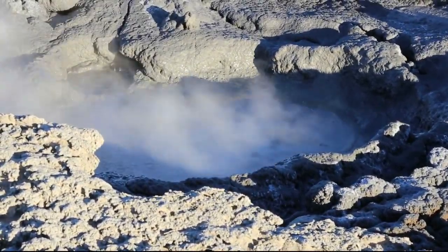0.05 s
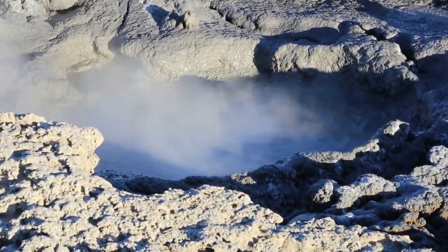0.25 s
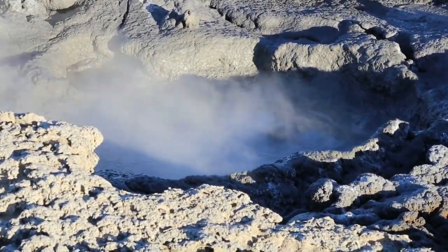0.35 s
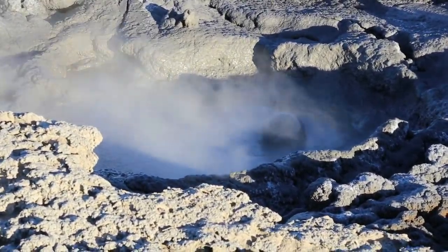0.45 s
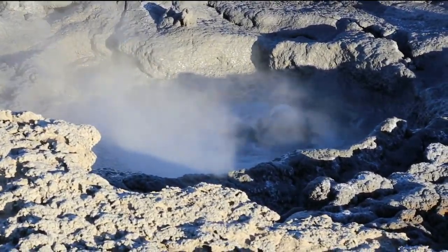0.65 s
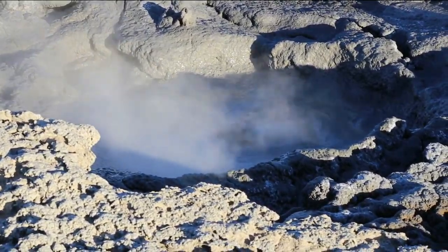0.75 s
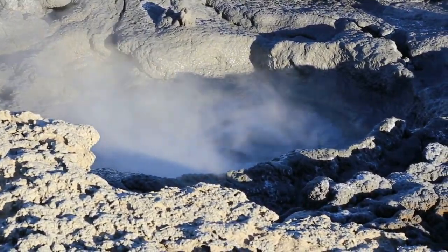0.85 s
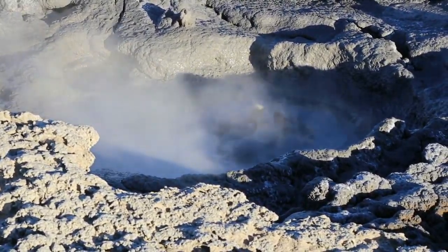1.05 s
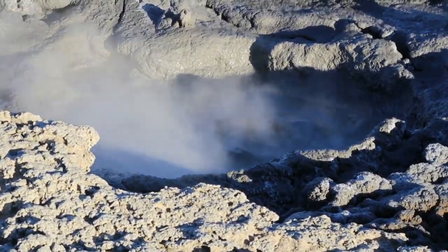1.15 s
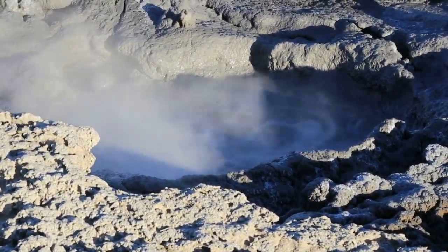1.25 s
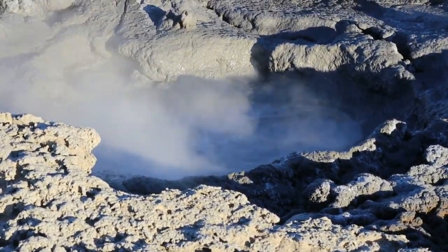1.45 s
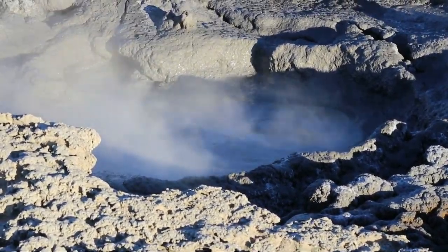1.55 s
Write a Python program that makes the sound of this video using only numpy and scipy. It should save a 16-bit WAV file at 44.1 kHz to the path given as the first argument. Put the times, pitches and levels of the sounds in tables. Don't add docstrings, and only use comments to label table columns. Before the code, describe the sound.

Close outdoor pickup of a bubbling mud pot, irregular plops, hollow gulps, splats and tiny ticks over constant seethe and quiet steam; the loudest bubble snaps late with short dull rim echoes, then activity thins.

```python
import sys
import numpy as np
from scipy import signal
from scipy.io import wavfile

SR = 44100
rng = np.random.default_rng(int(sys.argv[2]) if len(sys.argv) > 2 else 0)


def persist_wave(psi):
    counts = np.round(np.clip(psi, -1, 1) * 32767).astype(np.int16)
    wavfile.write(sys.argv[1], SR, np.atleast_2d(counts).T)


def volts_from_decibels(level):
    exponent = np.asarray(level, float) / 20
    return 10 ** exponent


N = 70560


def rms_one(x):
    return x / np.sqrt(np.mean(x ** 2) + 1e-20)


def bandpass(order, low_hz, high_hz, x):
    return signal.sosfilt(signal.butter(order, [low_hz, high_hz], "band", fs=SR, output="sos"), x)


def drift(rate_hz):
    pole = np.exp(-80 * np.pi * rate_hz / SR)
    noise = rng.standard_normal(N // 40 + 2002)
    slow = signal.lfilter([1], [1, -2 * pole, pole * pole], noise)[2000:]
    return np.interp(np.arange(N) / 40, np.arange(len(slow)), rms_one(slow))


def add(out, start_s, x):
    i = int(start_s * SR)
    out[i:i + len(x)] += x[:max(len(out) - i, 0)]


def banded(spectrum, patchy_db):
    hz, db = np.transpose(spectrum)
    together = drift(0.91)
    white = rng.standard_normal((2, N + SR))
    edges_hz = np.geomspace(hz[0], hz[-1], int(3 * np.log2(hz[-1] / hz[0])) + 1)
    out = 0
    for k, (low_hz, high_hz) in enumerate(zip(edges_hz, edges_hz[1:])):
        band = bandpass(2, low_hz, high_hz, white[k % 2])[SR:]
        level_db = np.interp(np.log(low_hz * high_hz) / 2, np.log(hz), db)
        flicker_db = patchy_db * (0.5 * together + drift(6.9))
        out = out + band * volts_from_decibels(level_db + flicker_db)
    return rms_one(out)


def bursts(rows, rise, attack_cycles):
    out = np.zeros(N)
    for start_s, peak_db, hz, ring_cycles in rows:
        cycle = np.arange(int(3 * ring_cycles / hz * SR) + 2) * hz / SR
        swell = 1 - np.exp(-(cycle / attack_cycles) ** 2)
        shape = swell * volts_from_decibels(-20 * cycle / ring_cycles)
        climb = 1 - rise / 2 + rise * cycle / ring_cycles
        add(out, start_s, volts_from_decibels(peak_db) * shape / shape.max() * np.sin(2 * np.pi * cycle * climb))
    return out


def vigour():
    # (time [s], level [dB])
    levels = [(0, -45.5), (.12, -47), (.18, -49), (.25, -45.5), (.41, -43.5), (.47, -47.5), (.6, -49),
              (0.658, -42), (.71, -43), (.76, -45.5), (.79, -38), (.82, -42.5), (.88, -44.5), (.93, -51.5),
              (1.0, -50.5), (1.1, -49.5), (1.25, -42.5), (1.33, -47), (1.6, -50.5)]
    s, db = np.transpose(levels)
    return np.interp(np.arange(N) / SR, s, db - db.mean())


def steam(swing_db):
    # (frequency [Hz], density [dB per Hz])
    spectrum = [(35, -9), (112, 1.5), (236, 6), (420, -6), (620, -1.5), (1600, -20), (3500, -25),
                (6400, -27)]
    level_db, follow, shelf_hz = -40, 0.06, 5330
    shelf = signal.ellip(4, 1, 25, shelf_hz, fs=SR, output="sos")
    return volts_from_decibels(level_db + follow * swing_db) * signal.sosfilt(shelf, banded(spectrum, patchy_db=0.7))


def seethe(swing_db):
    # (low [Hz], high [Hz], rate [per s], ring [cycles], level [dB], share of vigour swing [1])
    families = [
        (140, 326, 500, 4.5, -50.5, 0.067),
        (315, 1116, 500, 4.7, -49.5, 1.05),
        (1200, 4410, 2200, 4.1, -49, 0.93),
        (5000, 12000, 910, 2.8, -80, 2.2),
    ]
    n_pitches = 14
    out = 0
    for low_hz, high_hz, rate, ring_cycles, db, share in families:
        sizes = volts_from_decibels(2.5 * np.minimum(rng.exponential(1, N), 2.8)) * rng.choice([-1, 1], N)
        born = rng.random(N) < rate * volts_from_decibels(2.5 * drift(8.0)) / SR
        dealt = rng.integers(0, n_pitches, N)
        family = 0
        for k, hz in enumerate(np.geomspace(low_hz, high_hz, n_pitches)):
            r = volts_from_decibels(-60 * hz / (ring_cycles * SR))
            w = 2 * np.pi * hz / SR
            mode = [0, np.sin(w), 0, 1, -2 * r * np.cos(w), r * r]
            kicks = sizes * born * (dealt == k) + 1e-18
            family = family + w * signal.sosfilt([mode, mode], kicks)
        out = out + volts_from_decibels(db + share * swing_db) * rms_one(family)
    return out


def splats():
    # (start [s], length [s], level [dB], low [Hz], high [Hz])
    landings = [(0.032, 0.0076, -43.5, 1750, 3450), (.221, 0.0078, -47, 1200, 5200),
                (0.426, 0.016, -42, 2280, 4320), (0.683, 0.034, -45, 1200, 5000),
                (0.709, 0.015, -43, 1200, 5300), (0.757, 0.01, -57, 298, 1460),
                (0.779, 0.0089, -44.5, 1510, 5850), (0.964, 0.057, -42.5, 201, 660),
                (1.17, 0.0079, -41, 3030, 5500), (.685, .016, -61, 5000, 11000),
                (.712, 0.0064, -55.5, 5000, 12000), (1.236, 0.0043, -50, 2760, 6000),
                (1.243, 0.012, -47, 800, 5200), (1.26, 0.006, -51, 2000, 7000)]
    drops_per_s = 2500
    out = np.zeros(N)
    for (start_s, length_s, db, low_hz, high_hz), (chance, size) in zip(landings, rng.random((len(landings), 2, 4000))):
        u = np.arange(4000) / SR / length_s
        drops = (chance < drops_per_s / SR) * (size - 0.5)
        smear = 0.039 * (size - 0.5)
        shower = rms_one(bandpass(4, low_hz, high_hz, drops + smear))
        add(out, start_s, volts_from_decibels(db) * shower * np.minimum(8 * u, 1) * np.exp(-u ** 3))
    return out


def plops():
    # (time [s], peak [dB], pitch [Hz], ring [cycles])
    openings = [(.033, -31, 1000, 4.5), (.099, -31, 498, 5.1), (.1426, -32, 1290, 5.0),
                (.246, -30, 810, 2.6), (.339, -31, 704, 4.2), (.341, -33.5, 1090, 9.1),
                (.3975, -23, 740, 0.97), (.403, -35.5, 446, 8.1), (.409, -25, 635, 1.6),
                (.433, -31, 600, 3.3), (.486, -55, 590, 5.5), (.6672, -23.5, 540, 0.8),
                (.695, -32.5, 524, 9.3), (.7568, -21.5, 488, 1.9), (.7588, -22.5, 1350, 3.0),
                (.986, -27, 680, 0.47), (.996, -38, 596, 8.8), (1.106, -37.5, 616, 8.5),
                (1.2077, -26, 1200, 1.5), (1.2105, -31, 850, 3.5), (1.243, -31.5, 965, 7.5),
                (1.373, -31.5, 1160, 0.79), (1.4106, -29.5, 800, 1.4), (1.530, -44, 850, 13)]
    return bursts(openings, rise=0.074, attack_cycles=0.15)


def gulps():
    # (start [s], peak [dB], pitch [Hz], length [cycles])
    pockets = [(0.052, -34.5, 106, 2.2), (0.229, -25.5, 207, 5.9), (0.285, -20.5, 236.3, 7.3),
               (.312, -31.5, 299, 4), (.332, -36, 151, 3.9), (0.417, -30, 125, 3.3),
               (0.426, -30.5, 230, 3.5), (0.442, -25.5, 168, 2.5), (0.483, -28, 268, 2.55),
               (0.508, -31, 205, 3.1), (.705, -36, 252, 9.7), (0.744, -34, 225, 5),
               (0.7823, -25, 246.6, 3.86), (.776, -35, 154, 3.1), (0.966, -34.5, 309, 4.2),
               (.975, -31.5, 165, 5), (1.005, -38, 213, 5.3), (1.029, -36, 180, 4), (1.051, -38, 203, 4.6),
               (1.09, -35, 236.3, 9.2), (1.109, -35, 211, 8.3), (1.134, -36.5, 244, 6.3),
               (1.258, -34, 192, 4), (1.3, -39.5, 217, 7.3), (1.342, -35.5, 120, 3.9),
               (1.375, -39.5, 185, 6), (1.414, -31, 260, 2.6), (1.435, -33, 201, 3.6), (1.446, -36, 299, 5)]
    rise = 0.12
    out = np.zeros(N)
    for start_s, db, hz, cycles in pockets:
        u = np.linspace(0, 1, int(cycles / hz * SR))
        phase = 2 * np.pi * cycles * u * (1 + rise * (u - 1))
        add(out, start_s, volts_from_decibels(db) * np.sin(np.pi * u) ** 1.39 * np.sin(phase))
    return out


def pops():
    # (time [s], peak [dB], pitch [Hz], ring [cycles])
    skins = [(1.1688, -27, 2300, 4.1), (.2225, -32, 1530, 1.8), (.278, -39.5, 2300, 13),
             (.4085, -34.5, 3630, 5.8), (.428, -50, 3370, 4.0), (.4335, -34, 2600, 4),
             (.4338, -40, 4000, 4.3), (.592, -32.5, 1820, 5.2), (.593, -34.5, 3200, 7),
             (.6672, -30.5, 3760, 5.7), (.6672, -36, 2900, 2.8), (.696, -35.5, 2850, 11),
             (.756, -28.5, 3080, 4), (.7731, -26, 2400, 2.8), (.7809, -25, 2400, 1.6),
             (.7832, -30, 2200, 3), (.7768, -14.5, 1960, 2.46), (.7808, -25, 4170, 4.1),
             (.8015, -29, 2490, 3.8), (.8035, -20.5, 1590, 4.3), (.818, -42, 1480, 6.2),
             (.881, -36.5, 3000, 3.7), (1.1717, -1.5, 1950, 2.3), (1.1717, -30, 3260, 2.4),
             (1.2465, -38, 3960, 4.6), (1.2718, -30.5, 2280, 5.4), (1.537, -35.5, 2410, 4.4)]
    low_cut = signal.butter(1, 800, "high", fs=SR, output="sos")
    return signal.sosfilt(low_cut, -bursts(skins, rise=0.18, attack_cycles=0.65))


def crater(x):
    # (delay [s], level [dB])
    wall = [(.0019, -17), (.0028, -15), (.0037, -14), (.0049, -15), (.0058, -13), (.0067, -14),
            (.0090, -26), (.0101, -27), (.0112, -24), (.0127, -26)]
    out = np.zeros(N)
    for delay_s, db in wall:
        add(out, delay_s, volts_from_decibels(db) * x)
    return bandpass(2, 1640, 3000, out)


def ticks():
    # (time [s], peak [dB], upper edge [Hz])
    droplets = [(0.223, -35, 5730), (0.409, -47, 7900), (0.455, -44, 9000), (0.6866, -42, 11000),
                (.6895, -48, 9000), (0.6955, -42, 6000), (0.7121, -28.5, 7000), (.7147, -41, 14000),
                (.7192, -40, 5000), (.7252, -43, 9000), (0.7326, -44, 8000), (0.7358, -37, 10500),
                (.7488, -39, 10500), (.7595, -52, 9000), (0.7809, -31, 5440), (0.7812, -37, 15500),
                (0.8458, -40, 9900), (1.1714, -37, 4500), (0.7768, -25.5, 5450), (.9366, -45, 4000),
                (.9546, -28.5, 4000), (1.1162, -35, 5400), (1.1748, -38, 5000), (1.1868, -40, 16000),
                (1.208, -48, 9500), (1.2116, -41, 9500), (1.2358, -47, 7000), (1.246, -48, 8900),
                (1.250, -46, 8000), (1.2635, -42, 7000), (1.3113, -31, 4500), (1.4106, -34, 4500),
                (1.5208, -45, 4000)]
    splash_s, low_hz, snap, dull_pole = 0.0009, 1500, 3.0, 0.6
    out = np.zeros(N)
    t = np.arange(400) / SR
    click = snap * (t == t[20])
    for (s, db, top_hz), noise in zip(droplets, rng.standard_normal((len(droplets), 400))):
        splash = 0.2 * noise * np.exp(-t / splash_s)
        dulled = signal.lfilter([1], [1, -dull_pole], splash + click)
        add(out, s, volts_from_decibels(db) * bandpass(3, low_hz, top_hz, dulled))
    return out


def rings():
    # (time [s], peak [dB], pitch [Hz], ring [cycles])
    cavities = [(.6388, -24, 2130, 14), (.6385, -28.5, 1560, 4.7), (.642, -29, 1600, 7.8),
                (.6392, -28, 3150, 8.6), (.653, -34, 2300, 5.2), (.3385, -33, 2720, 13),
                (.432, -30, 2870, 8.1), (.7605, -28.5, 526, 2.7)]
    return bursts(cavities, rise=0, attack_cycles=2.0)


def scene():
    swing_db = vigour()
    skin_pops = pops()
    mud = seethe(swing_db) + splats() + plops() + gulps()
    mud = mud + skin_pops + crater(skin_pops) + ticks() + rings()
    return (mud + steam(swing_db))[None]


def roll_off(x):
    return signal.sosfilt(signal.butter(12, 16470, fs=SR, output="sos"), x)


def record(dry):
    # (frequency [Hz], density [dB per Hz])
    hiss = [(4500, -5), (7000, -1.5), (12500, 0), (16400, -5)]
    hiss_db, bass_cut_hz, top_cut_hz = -66.8, 52, 15800
    x = dry + volts_from_decibels(hiss_db) * banded(hiss, patchy_db=0)
    x = signal.sosfilt(signal.butter(2, bass_cut_hz, "high", fs=SR, output="sos"), x)
    x = signal.sosfilt(signal.ellip(10, 0.5, 30, top_cut_hz, fs=SR, output="sos"), x)
    return roll_off(x)


dry = scene()
out = record(dry)
persist_wave(out)
```